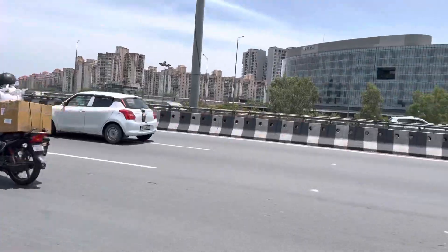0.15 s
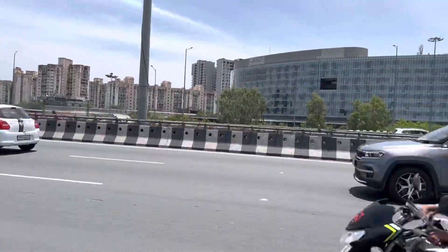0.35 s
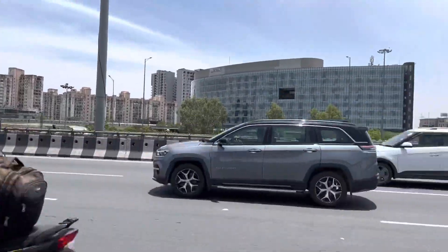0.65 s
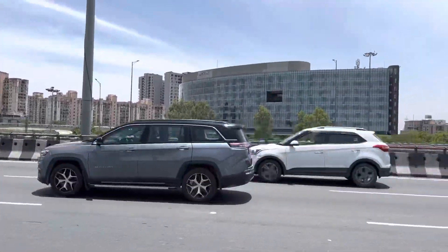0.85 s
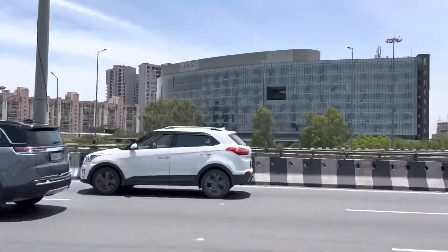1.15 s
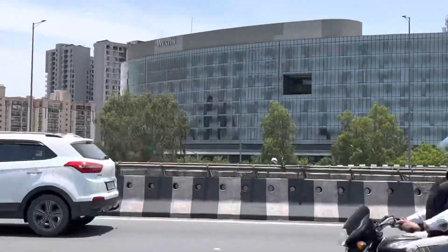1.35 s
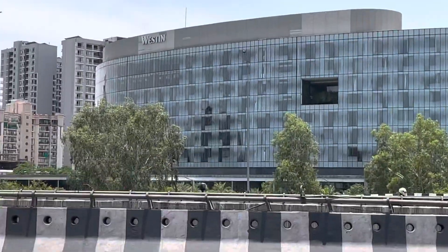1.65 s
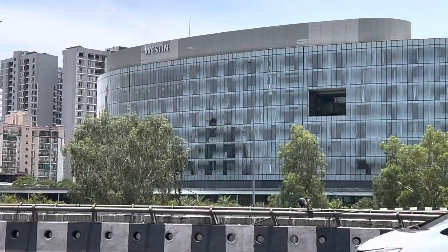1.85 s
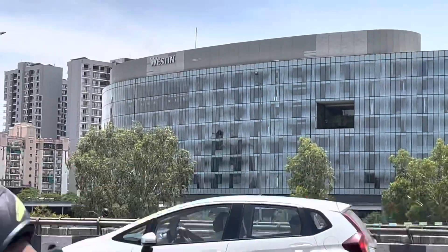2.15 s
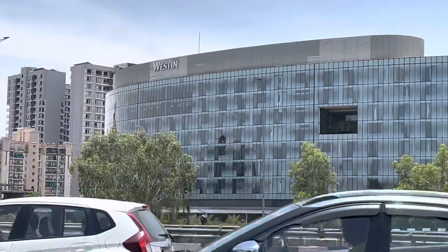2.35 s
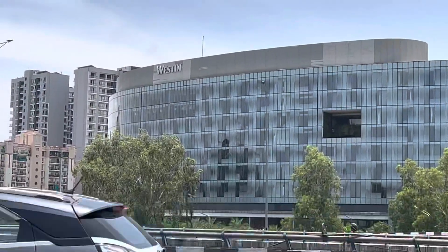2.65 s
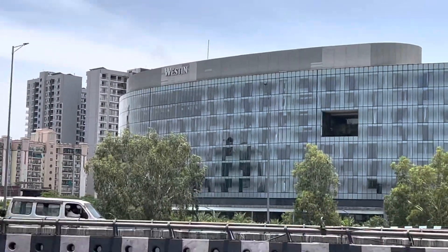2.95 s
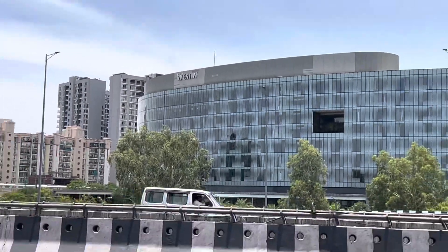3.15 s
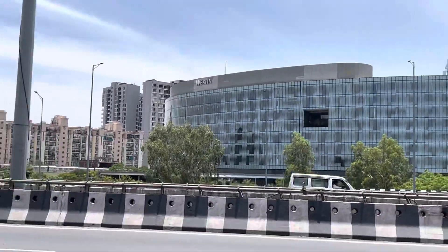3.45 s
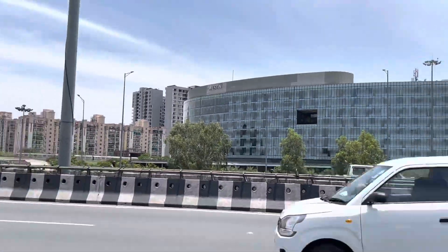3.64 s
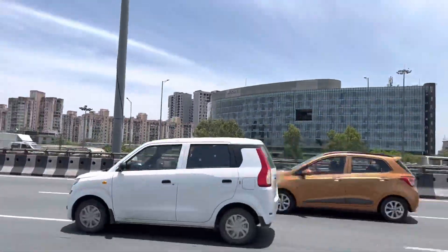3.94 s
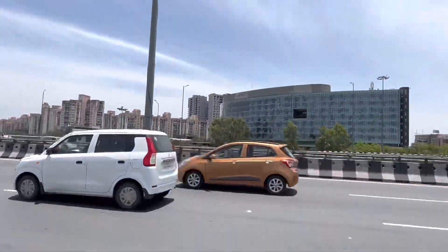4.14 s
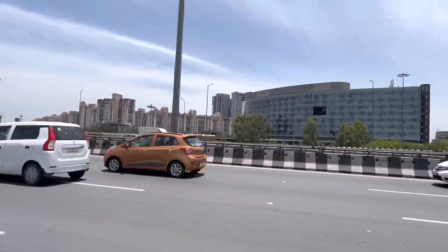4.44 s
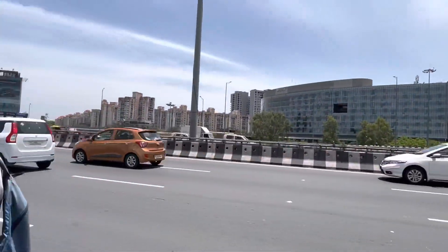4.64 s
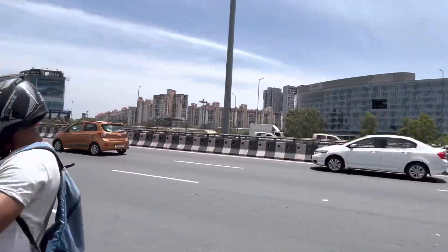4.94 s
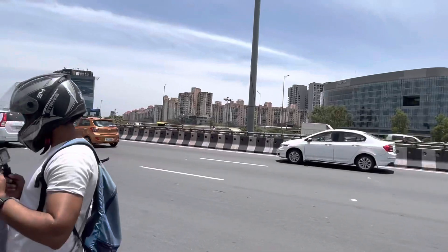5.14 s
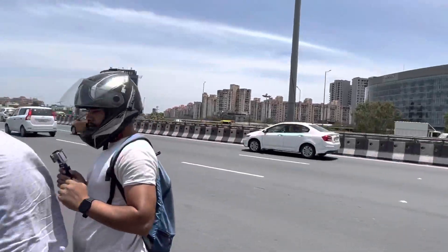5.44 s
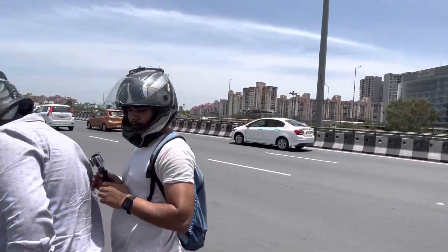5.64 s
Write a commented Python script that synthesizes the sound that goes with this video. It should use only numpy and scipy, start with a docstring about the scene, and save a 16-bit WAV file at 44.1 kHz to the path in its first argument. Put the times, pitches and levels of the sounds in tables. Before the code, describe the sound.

Cars and two putt-putting motorbikes rush past on a busy highway while gusting wind rumbles, thumps and flaps hard on a phone microphone.

```python
"""Cars stream along a highway: tyre roar is coloured noise that swells with nearness, close vehicles add hiss.
Engines pass as falling harmonic series over a drone; two bikes putter by as trains of silencer puffs. One
bike's chain jingles as a beating tone, a brake chirps in narrow noise bands, and small ticks click. A phone's
stereo microphone narrows onto the road and widens again. Wind on its ports rumbles, flutters and flaps as
modulated noise; eddies thump, and vortices slap as short oscillations."""
import sys
import numpy as np
from scipy import signal
from scipy.fft import rfft, irfft, next_fast_len
from scipy.io import wavfile
from scipy.ndimage import uniform_filter1d, map_coordinates

SR = 44100
rng = np.random.default_rng(int(sys.argv[2]) if len(sys.argv) > 2 else 0)


def materialize(psi):
    """Save the field psi as 16-bit PCM at rate SR to the path in sys.argv[1].

    A 1-D psi becomes a single channel; in a 2-D psi each row is a channel.
    """
    bounded = np.clip(np.atleast_2d(psi).T, -1, 1)
    quanta = np.round(bounded * 32767).astype(np.int16)
    wavfile.write(sys.argv[1], SR, quanta)


N = 255339
T = np.arange(N) / SR  # seconds


def amp(db):
    """Level law: an amplitude gain is ten to the power dB / 20."""
    return 10 ** (np.asarray(db) / 20)


def unit(x):
    """Normalisation by mean power: scale to rms 1."""
    return x / np.sqrt(np.mean(x ** 2) + 1e-20)


def along(points, hz):
    """Logarithmic frequency scale: (freq_hz, value) points interpolated along it."""
    f, v = np.transpose(points)
    return np.interp(np.log(hz + 1), np.log(f + 1), v)


def curves(rows):
    """Linear interpolation in time: one value per sample for each column after the time."""
    s, *columns = np.transpose(rows)
    return [np.interp(T, s, column) for column in columns]


def wobble(rate):
    """Band-limited fluctuation: a smooth random curve with rate knots a second."""
    knots = rng.standard_normal(int(N * rate / SR) + 4)
    coarse_t = T[::16]
    return np.interp(T, coarse_t, map_coordinates(knots, [coarse_t * rate]))


def filtered(x, response):
    """Linear filtering: the spectrum of x times a response of frequency."""
    size = next_fast_len(N + 8192)
    return irfft(rfft(x, size) * response(np.fft.rfftfreq(size, 1 / SR)), size)[..., :N]


def noise(spectrum, steady_s=0.094):
    """Incoherent sources: two unrelated coloured noises, levelled over steady_s and scaled to joint rms 1."""
    pair = filtered(rng.standard_normal((2, N)), lambda hz: amp(along(spectrum, hz)))
    size = int(steady_s * SR)
    power = uniform_filter1d(uniform_filter1d(pair ** 2, size=size), size=size)
    return unit(pair / np.sqrt(np.abs(power) + 1e-20))


def band(hz, width_hz):
    """Quadrature modulation: narrow noise of rms 1 around a pitch that may glide."""
    phase = 2 * np.pi * np.cumsum(hz * np.ones(N)) / SR
    return unit(wobble(width_hz) * np.cos(phase) + wobble(width_hz) * np.sin(phase))


def beats(at_s, rate_hz, half_s):
    """Periodic excitation: short swells at a steady rate, one of them at at_s."""
    offset = ((T - at_s) * rate_hz + .5) % 1 - .5
    return np.exp(-(offset / rate_hz / half_s) ** 2)


def stereo(pair, side_db):
    """Mid-side matrixing: left is the sum of mid and side, right the difference."""
    side = pair[1] * amp(side_db)
    return np.array([pair[0] + side, pair[0] - side])


# The wind spreads to both sides as the microphone opens.
SPREAD_AT_S = (4.24, 4.28)
# width of the wind's layers: side minus mid (dB before, dB after)
RUMBLE_WIDTH, FLUTTER_WIDTH, FLAP_WIDTH = (-16, 0), (-8, -1.2), (-5.5, 4.5)


def spread(pair, width):
    """Decorrelation between the ports: wind in stereo grows wider as the microphone opens."""
    return stereo(pair, np.interp(T, SPREAD_AT_S, width))


# wind on the ports, its rumble before the short changes: time_s, level_db
WIND_STRENGTH = [(0, -31), (1.85, -33.5), (2.15, -24.5), (2.6, -21), (2.93, -22.5), (3.03, -27),
                 (3.75, -28), (4.3, -35.5), (5.79, -34.5)]
# short gusts and lulls in the wind: centre_s, half_length_s, rumble_change_db, flutter_and_flapping_change_db
SHORT_WIND_CHANGES = [(0.624, 0.055, 7, 8), (0.942, 0.14, 7.5, 7.5), (1.098, 0.1, -4.5, 5),
                      (1.817, 0.089, -6, 8.5), (2.422, 0.09, 0, 1.5), (3.5, 0.055, -3.5, -1),
                      (4.09, 0.047, 7, 2.5), (4.6, 0.16, 3, 0)]
# colours of the rumble, the flutter and the slow-air flapping: freq_hz, relative_level_db (per Hz)
RUMBLE_COLOUR = [(33, -19), (58, 0), (85, -2.5), (130, -8.5), (200, -13.5), (400, -26), (1000, -100)]
FLUTTER_COLOUR = [(60, -7.5), (130, -2), (190, 0.5), (260, -1), (400, -15.5), (650, -22.5), (1500, -37),
                  (4000, -110)]
SOFT_FLAP_COLOUR = [(100, -67), (280, 5), (450, 4.5), (620, -3), (900, -38), (1500, -34), (5000, -81)]  # the slow eddies below use it too
BREEZE_DB = -36  # rumble of a light breeze
FLUTTER_DB, FLUTTER_GROWS = -40, 0.82  # level in that breeze before short changes; dB gained per dB of wind
FLAPPING_DB, FLAPPING_GROWS = -49, 0.42  # the same for the flapping


def wind():
    """Turbulent pressure on the ports: one wind strength drives rumble, quicker flutter and ragged flapping."""
    wind_db, = curves(WIND_STRENGTH)
    low_db, high_db = 0, 0
    for s, half_s, low, high in SHORT_WIND_CHANGES:
        bell = np.exp(-((T - s) / half_s) ** 2)
        low_db = low_db + bell * low
        high_db = high_db + bell * high
    force_db = wind_db - BREEZE_DB
    flutter_db = FLUTTER_DB + FLUTTER_GROWS * force_db + high_db
    flapping_db = FLAPPING_DB + FLAPPING_GROWS * force_db + high_db

    lumps = wobble(28)  # shared by all three layers
    rumble = amp(wind_db + low_db) * unit(noise(RUMBLE_COLOUR) * amp(0.5 * lumps))
    flutter_lumps = amp(2.0 * lumps + 3.0 * wobble(90))
    flutter = amp(flutter_db) * unit(noise(FLUTTER_COLOUR) * flutter_lumps)
    flapping_lumps = amp(2 * lumps + 1.7 * wobble(120))
    flapping = amp(flapping_db) * unit(noise(SOFT_FLAP_COLOUR) * flapping_lumps)
    return spread(rumble, RUMBLE_WIDTH) + spread(flutter, FLUTTER_WIDTH) + spread(flapping, FLAP_WIDTH)


# eddies over the ports: start_s, hold_s, level_db (before the speed losses), air_speed (0-1)
PORT_EDDIES = [(2.919, 0.039, -19.5, 0), (2.953, 0.023, -17.5, 0.38), (3.028, 0.026, -23.5, 0.74),
               (3.089, 0.046, -21.5, 0.64), (3.209, 0.026, -23, 0.67), (3.259, 0.02, -23.5, 0.84),
               (3.293, 0.025, -23.5, 0.7), (3.336, 0.038, -22, 0.9), (3.431, 0.028, -25, 0.97),
               (3.572, 0.0083, -20.5, 0.99), (3.59, 0.018, -17, 0.95), (3.616, 0.026, -17.5, 0.71),
               (4.066, 0.015, -27, 0.2), (4.421, 0.019, -26.5, 0.5), (4.537, 0.077, -28, 0.55),
               (5.006, 0.0074, -26.5, 0.88)]
# colours of the thump and of the fast-air flap: freq_hz, relative_level_db (per Hz)
THUMP_COLOUR = [(22, -22), (40, -6), (70, 6), (150, 8.5), (230, -2), (330, -6), (600, -46), (2000, -87)]
HARD_FLAP_COLOUR = [(100, -34), (300, 2.5), (560, 3.5), (930, -2.5), (1300, -11), (4000, -44), (12000, -73)]
THUMP_LOSS_DB, FLAP_LOSS_DB = 2, 16  # the fastest eddies thump less, the slowest flap less


def eddies(rise=0.0026, crackle_db=2.5):
    """Eddy turbulence: each gives a low thump and a ragged flap; faster air flaps louder and brighter."""
    thump, soft, hard = np.zeros((3, N))  # powers
    for s, hold_s, db, speed in PORT_EDDIES:
        fast = np.clip(speed, 0, 1)
        bright = fast ** 2
        onset = np.clip((T - s) / rise, 0, 1)
        release = np.clip((T - s - hold_s) / rise - 1, 0, 40)
        age = onset + release  # stands at 1, the envelope's peak, while the eddy holds
        power = (amp(db) * age * np.exp(1 - age)) ** 2
        thump += power * amp(-THUMP_LOSS_DB * fast) ** 2
        flap = power * amp(-FLAP_LOSS_DB * (1 - fast)) ** 2
        soft += flap * (1 - bright)
        hard += flap * bright
    thumps = np.sqrt(thump) * noise(THUMP_COLOUR)
    air = np.sqrt(soft) * noise(SOFT_FLAP_COLOUR) + np.sqrt(hard) * noise(HARD_FLAP_COLOUR)
    crackle = unit(amp(crackle_db * np.tanh(wobble(260))))
    flaps = amp(-0.3) * air * crackle
    return spread(thumps, FLUTTER_WIDTH) + spread(flaps, FLAP_WIDTH)


# single vortices that hit the ports: peak_s, level_db (mid signal), pitch_hz, half_length_s
VORTEX_SLAPS = [(0.977, -10.5, 151, 0.0024), (2.305, -11, 176, 0.007), (2.406, -10.5, 220, 0.0035),
                (2.469, -10.5, 270, 0.0019), (2.588, -17, 203, 0.0059), (2.81, -15.5, 70, 0.012),
                (2.856, -12, 220, 0.0043), (2.965, -14, 400, 0.0022), (2.982, -13.5, 328, 0.0039),
                (3.002, -6, 324, 0.0023), (3.008, -9.5, 322, 0.0046), (3.027, -20, 450, 0.0036),
                (3.067, -13.5, 503, 0.0054), (3.269, -19, 300, 0.0022), (3.347, -15, 403, 0.0048),
                (3.366, -15, 545, 0.003), (3.454, -25, 520, 0.0023), (3.572, -4.5, 500, 0.00092),
                (3.593, -11, 514, 0.0017), (3.62, -11, 400, 0.0025), (3.638, -12.5, 330, 0.0024),
                (4.079, -18, 200, 0.0044), (4.152, -23, 180, 0.0054), (4.322, -25.5, 398, 0.0038),
                (4.426, -22, 480, 0.0016), (4.612, -24, 128, 0.012), (4.676, -22.5, 340, 0.004),
                (4.864, -18.5, 250, 0.0021), (2.44, -21, 300, 0.003)]


def slaps(scatter=0.66):
    """Vortex impact: each gives one blunt pressure slap, an oscillation in a short bell-shaped envelope."""
    out = np.zeros((2, N))
    turns = rng.uniform(0, 2 * np.pi, (len(VORTEX_SLAPS), 2))
    for (s, db, hz, half_s), (turn, side_turn) in zip(VORTEX_SLAPS, turns):
        swell = amp(db) * np.exp(-((T - s) / half_s) ** 2)
        phase = 2 * np.pi * hz * (T - s) + scatter * wobble(400)
        out += swell * np.cos([phase + turn, phase + side_turn])
    return spread(out, FLUTTER_WIDTH)


# small sharp ticks: peak_s, level_db, pitch_hz
SHARP_TICKS = [(3.228, -47, 13500), (3.339, -47, 13680), (4.855, -45, 10100)]


def ticks(life=0.0013):
    """Transient noise bands: tiny bright clicks, a few milliseconds each."""
    out = 0
    for s, db, hz in SHARP_TICKS:
        envelope = np.exp(-np.minimum(np.abs(T - s) / life, 20))
        out = out + amp(db) * envelope * band(hz, width_hz=2400)
    return out


# brake chirps: peak_s, level_db (before panning), pitch_hz
BRAKE_CHIRPS = [(0.345, -42.5, 7020), (0.45, -40, 6920)]
# a bike's chain rings as it passes
CHAIN_AT_S, CHAIN_HALF_S, CHAIN_DB = 2.085, 0.21, -38.5
CLINK_AT_S, CLINKS_PER_S = 3.1, 29.8  # a moment on the beat, and the rate
CHAIN_HZ, CHAIN_SAG_HZ_PER_S = 4660, 860  # its pitch when nearest, and how fast that falls
CHAIN_SUSTAIN = 0.22  # ringing left between two clinks, against a clink


def squeals(clink_s=0.0032, rebound_s=0.009, rebound=0.55, uneven_db=2.0, rough=1.1):
    """Repeated impact and friction: a chain clinks and rebounds, sinking in pitch; a brake chirps twice."""
    age = T - CHAIN_AT_S
    chain_hz = CHAIN_HZ - CHAIN_SAG_HZ_PER_S * age
    phase = 2 * np.pi * np.cumsum(chain_hz) / SR + rough * wobble(360)
    strikes = beats(CLINK_AT_S, CLINKS_PER_S, clink_s)
    rebounds = rebound * beats(CLINK_AT_S + rebound_s, CLINKS_PER_S, clink_s)
    clinks = CHAIN_SUSTAIN + strikes + rebounds
    ring = unit(np.cos(phase) * clinks * amp(uneven_db * wobble(40)))
    chain = amp(CHAIN_DB) * np.exp(-(age / CHAIN_HALF_S) ** 2) * ring

    chirps = 0
    for s, db, hz in BRAKE_CHIRPS:
        swell = np.exp(-((T - s) / 0.026) ** 2)
        chirps = chirps + amp(db) * swell * band(hz, width_hz=220)
    return chain + chirps * np.array([[.9], [.6]])  # chirps lean left


# single-cylinder bikes: loudest_s, level_db (before firing pulses and panning), firing_hz,
# silencer_hz (when loudest), half_s (time after which the amplitude halves)
PASSING_BIKES = [(0.327, -23.5, 23.65, 273.4, 0.448), (1.82, -21.5, 30.8, 204.1, 0.539)]
BIKE_FRONT_SCREEN = 14.4  # the silencer points backwards: a bike swells this much faster than it fades
BIKE_PITCH_FALL = 0.14  # share by which its note ends below silencer_hz, having begun as far above


def bikes(puff_s=0.0054, between=0.34, uneven_db=2.5, rough=1.0):
    """Pulsed excitation of a silencer: every firing is a low puff, deeper once the bike is past."""
    out = np.zeros((2, N))
    for s, db, firing_hz, pipe_hz, half_s in PASSING_BIKES:
        away = (T - s) / half_s
        hz = pipe_hz * (1 - BIKE_PITCH_FALL * np.tanh(2 * away))
        pipe = np.cos(2 * np.pi * np.cumsum(hz) / SR + rough * wobble(150))
        pan_db = np.outer([.5, -.5], 1 - np.tanh(away))  # from the right to the middle
        level = amp(db + uneven_db * wobble(25.1) - pan_db)
        near = 1 / (1 + np.where(away < 0, away * BIKE_FRONT_SCREEN, away) ** 2)
        puffs = between + beats(s, firing_hz, puff_s)
        out += level * near * puffs * pipe
    return out


# engines passing close: nearest_s, level_db (when nearest, before unevenness), firing_hz, distance_m
PASSING_ENGINES = [(0.485, -35, 92.6, 3.2), (1.048, -39.5, 105.4, 5.16), (1.639, -32.5, 91.9, 2.52),
                   (1.878, -36.5, 95.6, 2.15), (2.198, -34, 57.53, 4.1)]
# exhaust colour: freq_hz, relative_level_db
EXHAUST_COLOUR = [(30, 11), (70, 6.5), (150, 2), (250, 14.5), (400, -6.5), (900, -39), (2000, -32)]
# distant engines: freq_hz, relative_level_db (per Hz)
DRONE_COLOUR = [(25, -24), (65, 20), (150, -7), (330, 18), (450, -24), (700, -50), (1500, -78)]


def engines(speed=15, unsteady=0.0249, count=10):
    """Doppler effect: firing harmonics drop in pitch, crossing right to left over a distant drone (speed in m/s)."""
    out = amp(-43.5) * stereo(noise(DRONE_COLOUR), side_db=-21)
    for s, db, firing_hz, distance in PASSING_ENGINES:
        ahead = speed * (T - s)  # metres past the nearest point
        r = np.hypot(ahead, distance)
        heard = T - r / 343  # travel at the speed of sound, m/s
        phase = 2 * np.pi * firing_hz * (heard + unsteady * np.cumsum(wobble(30)) / SR)
        note = 0
        for k in range(1, count + 1):
            harmonic = np.sin(k * phase + rng.uniform(0, 2 * np.pi))
            note = note + amp(along(EXHAUST_COLOUR, k * firing_hz)) * harmonic
        screened = (distance / r) ** 2.0  # other vehicles soon hide it
        pan_db = np.outer([1, -1], 1.8 * ahead / r)
        out += amp(db + 0.94 * wobble(38.7) + pan_db) * screened * unit(note)
    return out


# microphone pickup, the rest being its normal pattern: time_s, aimed_share (0-1), open_share (0-1)
PICKUP_PATTERN = [(0, 0.17, 0), (1.165, 0, 0), (1.19, 0.99, 0), (3.72, 1, 0), (4.25, 0.02, 0.8)]
# cars rolling past: nearest_s, roar_db, tread_db (both before the aim gain; tread also before its trim),
# half_s (time to halve the roar's power)
ROLLING_CARS = [(0.5, -41.5, -51, 0.1), (1.35, -38.5, -37.5, 0.28), (1.98, -38, -45.5, 0.5),
                (3.67, -62, -48.5, 0.13), (4.33, -38.5, -54, 0.35), (5.65, -35.5, -45.5, 0.34)]
# hiss of the closest vehicles: alongside_s, stay_s, level_db (before flicker)
CLOSE_HISS = [(0.38, .17, -54), (1.58, .66, -48.5), (5.62, .2, -57)]
STREAM_DB, STREAM_HISS_DB = -40.5, -65  # roar (before the aim gain) and hiss of the steady stream
AIMED_GAIN_DB = 2.5  # roar and tread are louder while the microphone aims at the road
APPROACH_DB_PER_S, LEAVE_DB_PER_S = 13.5, 61  # the hiss grows slowly and is soon screened


def traffic_levels():
    """Distance law: gains of roar and tread swell with nearness; each hiss rises, stays and drops away."""
    roar, tread, hiss = amp(STREAM_DB) ** 2, 0, amp(STREAM_HISS_DB) ** 2  # powers add
    for s, roar_db, tread_db, half_s in ROLLING_CARS:
        near = 1 / (1 + ((T - s) / half_s) ** 2)
        roar = roar + amp(roar_db) ** 2 * near
        tread = tread + (amp(tread_db) * near) ** 2  # treble carries less far
    for s, stay_s, db in CLOSE_HISS:
        approach_db = APPROACH_DB_PER_S * np.maximum(s - T, 0)
        leave_db = LEAVE_DB_PER_S * np.maximum(T - s - stay_s, 0)
        hiss = hiss + amp(db - approach_db - leave_db) ** 2
    aim = amp(AIMED_GAIN_DB * np.clip(curves(PICKUP_PATTERN)[0], 0, 1))
    return aim * np.sqrt(roar), aim * np.sqrt(tread), np.sqrt(hiss)


def wash(spectrum, core, width, lead, facing):
    """Partial coherence: stereo noise, mid rms 1 in the core band, left port ahead by facing * lead(hz)."""
    size = next_fast_len(N)
    hz = np.fft.rfftfreq(size, 1 / SR)
    mid, other = rfft(rng.standard_normal((2, size))) * amp(along(spectrum, hz))
    in_core = (hz > core[0]) & (hz < core[1])
    core_rms = np.sqrt(2) * np.linalg.norm(mid[in_core]) / size
    ahead = np.clip(lead(hz), -.95, .95)
    wide = amp(along(width, hz))
    # a delay between the ports puts part of the mid, a quarter cycle on, into the side
    direct = 1j * ahead * wide * mid
    diffuse = np.sqrt(1 - ahead ** 2) * wide * other
    mid, direct, diffuse = irfft([mid, direct, diffuse], size)[:, :N]
    return stereo([mid, facing * direct + diffuse], 0) / core_rms


def patchy(x, depth_db, size=1024):
    """Time-frequency modulation: passing treads and road texture make patches of the spectrum swell and sink."""
    z = signal.stft(x, nperseg=size)[2]
    field = rng.standard_normal(z.shape[1:])
    field = uniform_filter1d(uniform_filter1d(field, size=5, axis=0), size=12, axis=1)
    return signal.istft(z * amp(depth_db * unit(field)), nperseg=size)[1][:, :N]


# tyre roar in the normal, aimed and open pickup: freq_hz, relative_level_db (per Hz)
ROAR_NORMAL_COLOUR = [(150, 1), (400, 2), (650, 1), (930, 2.5), (1400, -3.5), (2000, -6.5), (2700, -6.5),
                      (4200, -16), (6000, -44), (12000, -106)]
ROAR_AIMED_COLOUR = [(150, -7.5), (450, -0.5), (750, -1.5), (1150, -1.5), (1330, -3), (1600, 0), (1650, -5),
                     (1690, 2.8), (1820, 0.5), (2000, -4), (3200, -10.5), (4200, -15), (6500, -25.5),
                     (12000, -98)]
ROAR_OPEN_COLOUR = [(150, -28), (370, 4.5), (520, -2.5), (800, 0.5), (1150, -1), (1400, -4.5), (1900, -5),
                    (2500, -6), (3100, -13.5), (4200, -15.5), (6000, -27.5), (12000, -73)]
# hiss of close vehicles in the narrower and the open pickups, then tread: freq_hz, relative_level_db (per Hz)
HISS_COLOUR = [(1200, -20), (3000, 5.5), (5000, 11), (7200, 3.5), (8400, -31.5), (10000, 2.5),
               (13000, -2.5), (14600, -8)]
HISS_OPEN_COLOUR = [(1200, -20), (3000, 16), (4400, 13.5), (6000, 14), (7200, 4), (9800, 5), (12500, -2.5),
                    (14600, -11)]
TREAD_COLOUR = [(150, -1), (450, 8.5), (900, 8), (1500, -3.5), (2600, 4), (3900, 2.5), (5500, -9.5),
                (7500, -9), (12000, -127)]
# the road's width in each pickup: freq_hz, side_minus_mid_db
NORMAL_WIDTH = [(400, -2.5), (700, 0), (1500, 6), (2300, -9), (3000, 2), (4200, -5.5), (7000, 3.5),
                (12000, -3.5)]
AIMED_WIDTH = [(400, -3), (700, -2.5), (1500, 5), (1800, -3.5), (2500, -11.5), (4500, -36), (6000, -5.5),
               (7500, 10), (12000, -5.5)]
OPEN_WIDTH = [(400, -0.5), (700, 3), (1400, 7), (2000, 3), (2600, -2.5), (3500, 3.5), (4200, 0.5),
              (12000, -2.5)]
# phase between the two ports in the narrower pickups: freq_hz, left_lead (-1 to 1, limited to 0.95)
NARROW_LEAD = [(200, 0), (650, -0.67), (1100, -.4), (1500, -0.7), (2000, -0.73), (3000, -0.4), (4500, -.2),
               (6500, 0.98), (9500, -.6), (12000, 0)]
# stereo lean of the traffic: time_s, lean (right -1, left 1)
TRAFFIC_LEAN = [(0, 0.83), (0.9, 0.56), (1.6, 0.37), (3.6, 0.061), (4.3, 0.98), (4.85, 0.72), (5.1, 0.69),
                (5.79, 0.48)]
# balance of the channels: freq_hz, left_minus_right_db
CHANNEL_LEAN = [(300, -5.5), (680, 1.5), (1250, -4), (2300, -4), (4300, -1.5), (10000, -2.5)]


def tyres(port_delay=0.00027, direct=0.25, swing_db=2.4):
    """Rolling noise: roar and close hiss, power cross-faded between pickups, with tread in one fixed image."""
    roar_gain, tread_gain, hiss_gain = traffic_levels()
    lean, = curves(TRAFFIC_LEAN)
    roar = roar_gain * amp(0.22 * wobble(13))
    hiss = hiss_gain * amp(-0.57 + 1.06 * wobble(45) + 0.89 * wobble(220))
    aimed, opened = np.clip(curves(PICKUP_PATTERN), 0, 1)
    normal = np.clip(1 - aimed - opened, 0, 1)

    def narrow(hz):
        """Phase difference: the left port's lead, read from its table."""
        return along(NARROW_LEAD, hz)

    def spaced(hz):
        """Path difference: a car reaches the nearer port first."""
        return direct * np.sin(2 * np.pi * hz * port_delay)

    pickups = [(normal, ROAR_NORMAL_COLOUR, HISS_COLOUR, (NORMAL_WIDTH, narrow, 1)),
               (aimed, ROAR_AIMED_COLOUR, HISS_COLOUR, (AIMED_WIDTH, narrow, 1)),
               (opened, ROAR_OPEN_COLOUR, HISS_OPEN_COLOUR, (OPEN_WIDTH, spaced, lean))]
    roar_band, tread_band, hiss_band = (900, 2800), (2500, 4300), (9800, 14000)  # Hz
    out = amp(-3.0) * tread_gain * wash(TREAD_COLOUR, tread_band, AIMED_WIDTH, narrow, 0.46)
    for share, low, high, image in pickups:
        low_wash = roar * wash(low, roar_band, *image)
        high_wash = hiss * wash(high, hiss_band, *image)
        out = out + np.sqrt(share) * (low_wash + high_wash)
    out = patchy(out, depth_db=1.67) * amp(np.outer([1, -1], swing_db * lean))
    return filtered(out, lambda hz: amp(np.outer([.5, -.5], along(CHANNEL_LEAN, hz))))


# bands of the traffic that dip or swell: centre_s, half_length_s, change_db, centre_hz, half_width_octaves
BAND_DIPS = [(3.8, 0.43, -11, 460, 0.88), (4.92, 0.023, -9, 300, 0.72), (5.22, 0.13, -5.5, 470, 0.78),
             (5.68, 0.26, -3, 2400, 1), (3.8, 0.13, 7, 4300, 0.21)]


def dipped(x):
    """Time-varying equalisation: single bands of the traffic sink or swell briefly."""
    for s, half_s, db, centre_hz, octaves in BAND_DIPS:
        gain = amp(db * np.exp(-((T - s) / half_s) ** 2))
        part = filtered(x, lambda hz: np.exp(-(np.log2((hz + 1) / centre_hz) / octaves) ** 2))
        x = x + (gain - 1) * part
    return x


def scene():
    """Superposition: wind on the microphone, small sounds and bikes, and the traffic in front."""
    on_ports = wind() + eddies() + slaps()
    traffic = dipped(engines() + tyres())
    return on_ports + ticks() + squeals() + bikes() + traffic


LOW_CUT_HZ, TOP_HZ = 36, 14600  # the microphone's bass roll-off, and the band limit


def record(dry):
    """Band limitation: the phone cuts the deepest rumble and keeps nothing above its band limit."""
    def response(hz):
        low_cut = 1 / np.sqrt(1 + (LOW_CUT_HZ / (hz + 1)) ** 8)
        return low_cut * (hz < TOP_HZ)
    return filtered(dry, response)


dry = scene()
out = record(dry)
materialize(out)
```